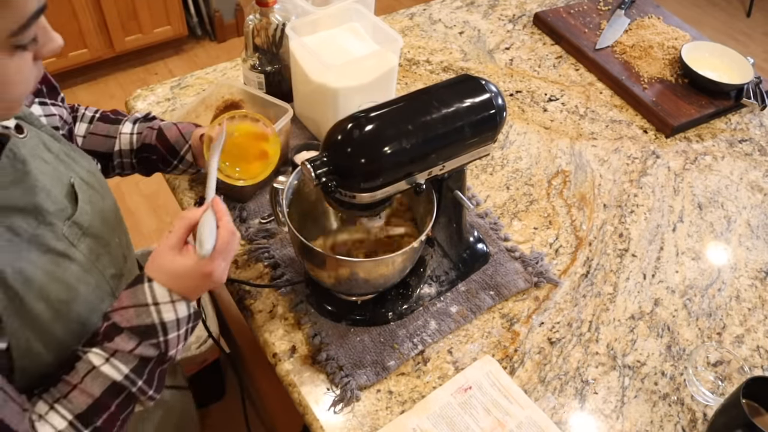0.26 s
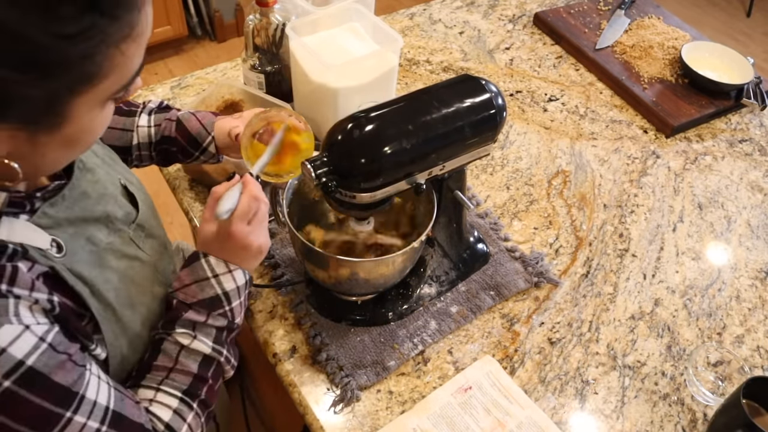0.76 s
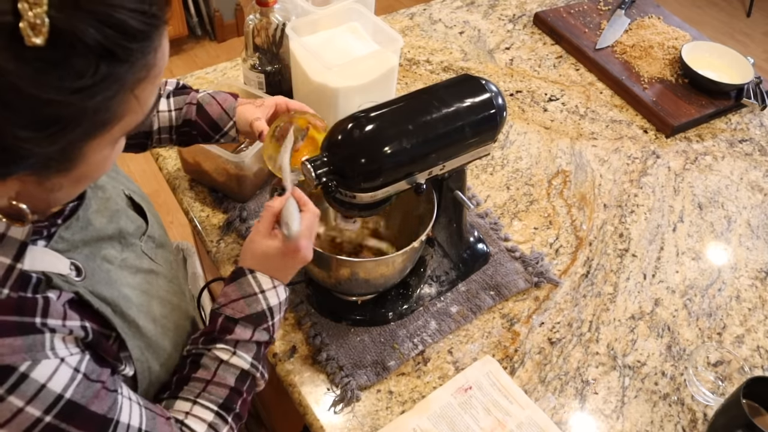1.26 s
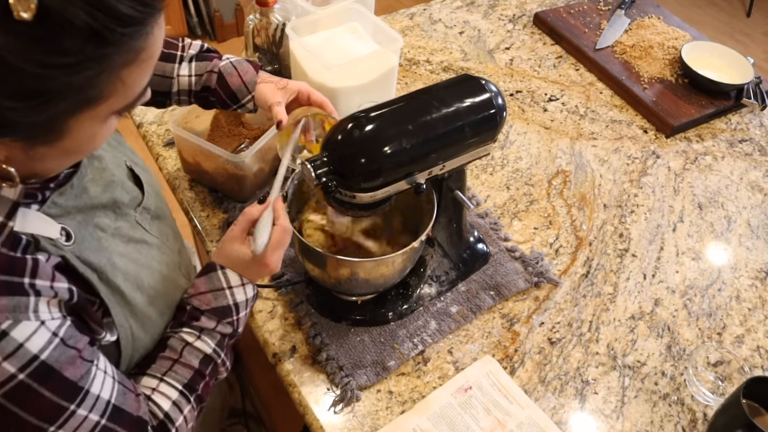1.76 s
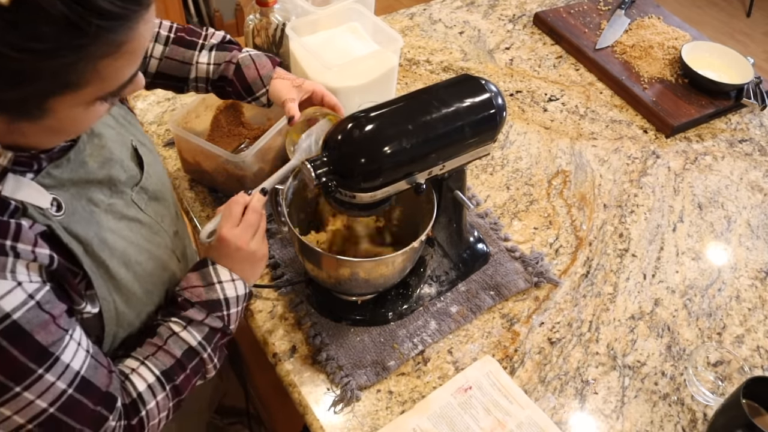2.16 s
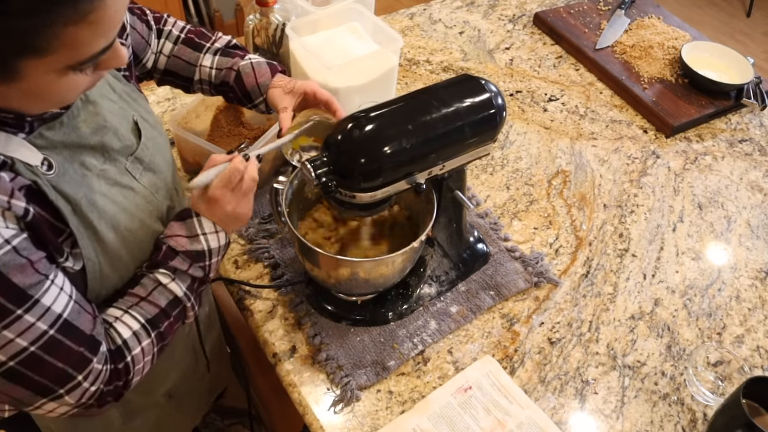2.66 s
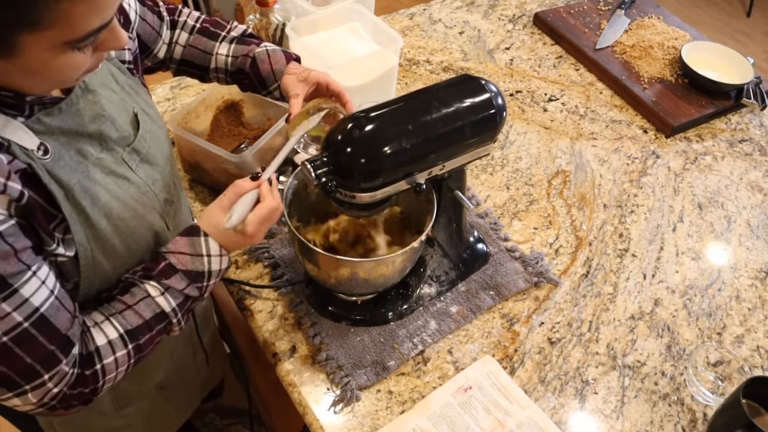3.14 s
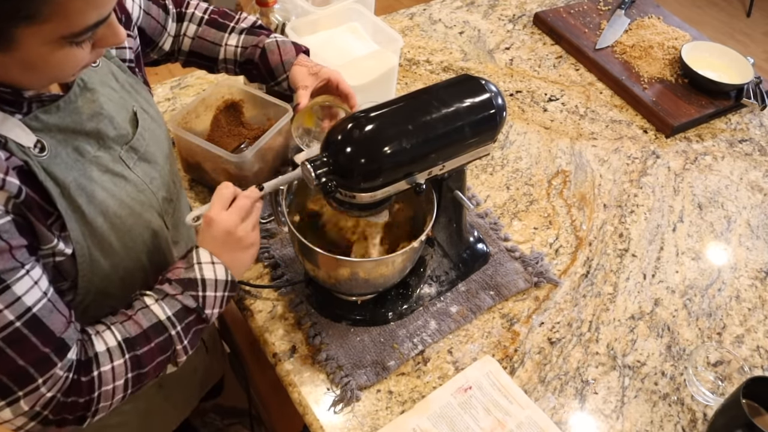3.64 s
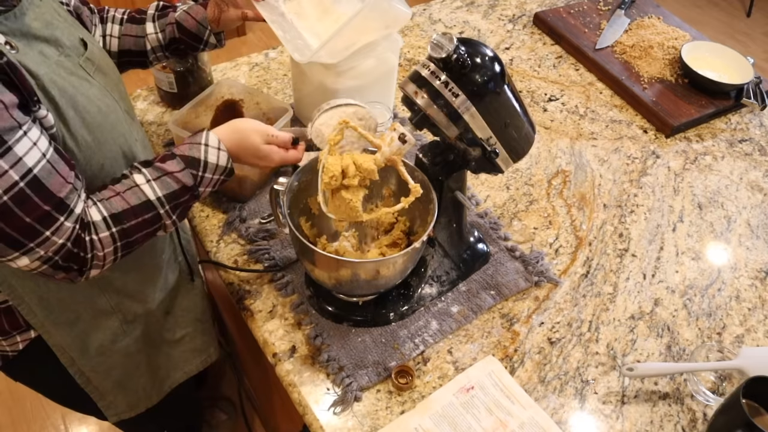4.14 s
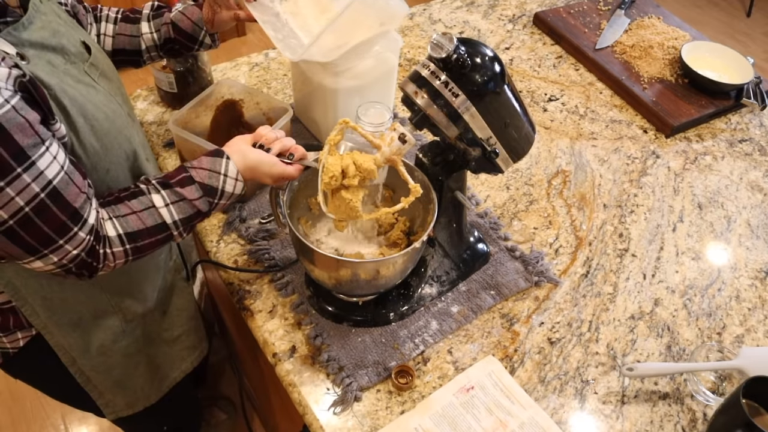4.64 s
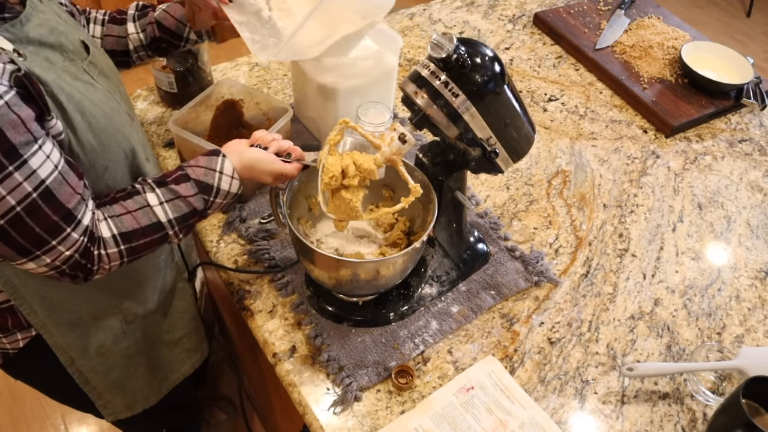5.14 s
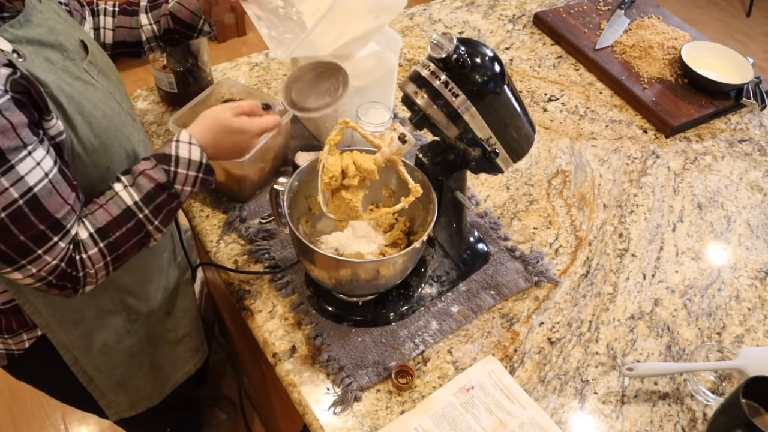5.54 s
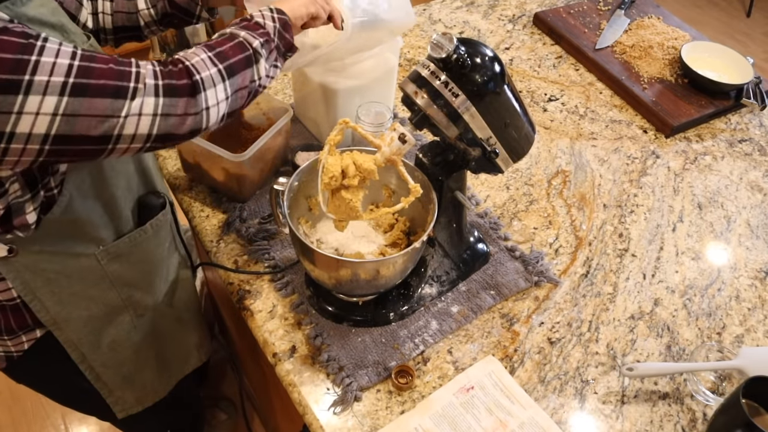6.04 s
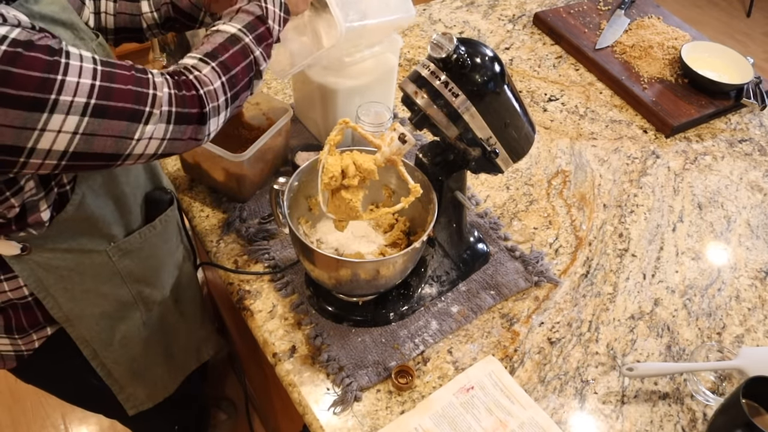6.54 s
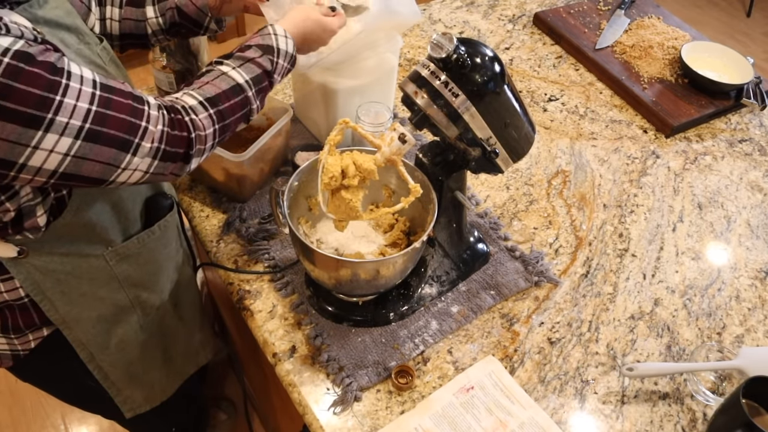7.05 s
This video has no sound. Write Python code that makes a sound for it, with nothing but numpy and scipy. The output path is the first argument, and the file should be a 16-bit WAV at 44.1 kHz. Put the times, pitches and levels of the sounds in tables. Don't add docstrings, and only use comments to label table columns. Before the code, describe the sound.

A stand mixer whines and rattles steadily while a spatula clinks on a glass dish, then cuts off to quiet plastic knocks and rustling.

```python
import sys
import numpy as np
from scipy import signal
from scipy.fft import rfft, irfft
from scipy.io import wavfile
from scipy.ndimage import uniform_filter1d

SR = 44100
rng = np.random.default_rng(int(sys.argv[2]) if len(sys.argv) > 2 else 0)


def transcribe(u):
    v = np.clip(np.atleast_2d(u).T, -1, 1)
    q = np.round(v * 32767).astype(np.int16)
    wavfile.write(sys.argv[1], SR, q)


def magnitude_from_level(level_db):
    exponent = np.asarray(level_db, float) / 20
    return 10 ** exponent


N = 321930
T = np.arange(N) / SR
MOTOR_OFF_S = 4.168

# (time [s], frequency [Hz])
MESH_PITCH = [(0.0, 1879), (0.28, 1852), (0.55, 1891), (0.72, 1858), (0.96, 1848), (1.13, 1892),
              (1.37, 1852), (1.47, 1882), (1.8, 1853), (1.9, 1870), (2.46, 1863), (2.6, 1891), (2.97, 1845),
              (3.14, 1892), (3.5, 1851), (3.62, 1868), (4.03, 1879), (4.17, 1850)]
# (multiple of throb rate [1], level re mesh tone [dB])
SIDE_TONES = [(-2, -22), (-1, -13), (2, -17), (3, -21)]
# (frequency [Hz], level [dB])
HUM_TONES = [(120, -67), (250, -71.5), (6652, -76)]
# (frequency [Hz], half width [Hz], level [dB])
CASING_MODES = [(252.3, 18, -3), (462, 52, 3), (663, 29.3, 2.5), (784, 45, 4), (844.4, 14.4, 5.5),
                (1100, 56, -1), (1885, 560, -8.5)]
# (frequency [Hz], level [dB per Hz])
FAN_SPECTRUM = [(88, -51), (150, -53), (244, -5.5), (303, -16.5), (475, -4), (566, -21), (662, -5),
                (1420, -12), (1900, -3), (2270, -16), (6770, -6.5), (14800, -24), (16000, -49)]

# (low edge [Hz], high edge [Hz])
BLOW_BANDS = [(600, 2000), (100, 600), (2000, 13000)]
# (time [s], mid level [dB], low level [dB], high level [dB], pitch of struck spot [Hz])
DISH_KNOCKS = [
    (1.489, -48, -42, -57, 2020),
    (1.627, -30, -46, -22.5, 4500),
    (1.935, -21, -41, -16.5, 5370),
    (1.948, -32, -45, -22.5, 3400),
    (2.361, -29, -47.5, -46, 2680),
    (2.629, -25, -53, -27.5, 3330),
    (2.642, -31, -44.5, -27.5, 5260),
    (3.538, -24, -35.5, -18, 2200),
    (3.55, -26.5, -53, -23, 4970),
]
TUB_KNOCKS = [(5.316, -23, -23, -24, 650), (5.348, -31, -26.5, -50, 750), (5.409, -32.5, -19.5, -52, 660),
              (5.556, -28.5, -25.5, -44, 760), (5.573, -30, -31.5, -60, 724), (6.03, -6, -11, -16.5, 950),
              (6.062, -11.5, -17.5, -10, 960), (6.19, -22, -19.5, -31, 966), (6.228, -23.5, -5.5, -30, 620),
              (6.524, -24, -42.5, -18, 1300), (6.939, -37, -32.5, -55, 1070)]
SCOOP_KNOCKS = [
    (6.799, -42, -53, -52, 4020),
    (6.81, -41, -56, -38, 4060),
    (6.831, -38, -64, -40, 4500),
    (6.857, -33, -58, -37, 3700),
    (6.868, -21, -45, -62, 2760),
    (6.881, -44, -40, -49, 3080),
]
LID_THUDS = [
    (6.569, -32, -35, -53, 950),
    (6.591, -46, -32.5, -36, 958),
    (6.715, -41, -26.5, -39.5, 1350),
]
SET_DOWN = [
    (7.169, -36.5, -22, -64, 600),
    (7.181, -56, -25.5, -63, 740),
]
RUSTLES = [(4.418, -43.5, -59, -45, 977), (4.546, -44, -46, -58, 680), (4.649, -44, -50, -57, 942),
           (4.702, -40.5, -42, -44, 870), (4.734, -53, -45, -45, 972), (4.797, -48, -51, -49, 1190),
           (4.822, -40, -44, -50, 818), (4.831, -50, -45, -47, 1090), (4.853, -63, -44, -57, 1100),
           (5.16, -34.5, -39.5, -35.5, 860), (6.469, -38, -55, -33, 1030), (6.476, -38, -37.5, -39, 1310)]
# (frequency [Hz], level [dB], t60 [s])
DISH_MODES = [(360, 0, .2), (890, -7, .1), (985, 0, .16), (1028, 0, .12), (1410, -5, .14), (1565, -7, .1),
              (1765, -2, .18), (2025, 0, .08), (2150, -3, .08), (2420, -3, .1), (3400, -3, .22),
              (4124, -8, .1), (4840, 0, .25), (4990, -3, .12), (5160, -2, .14), (5440, -4, .12),
              (7350, -8, .08), (8630, -10, .1)]
TUB_MODES = [(130, -3, .1), (163, 1, .1), (230, -9, .1), (317, -7, .18), (378, 0, .17), (410, -6, .12),
             (545, -9, .08), (720, 0, .08), (820, 0, .08), (950, 2, .08), (1133, -2, .06), (1370, -6, .05),
             (1460, -6, .05)]
SCOOP_MODES = [(400, 0, 0.11), (960, -18, .12), (1040, -7, 0.19), (1160, -2, 0.24), (1315, 23, 0.098),
               (1330, 22, .15), (1420, -11, 0.086)]

# (peak time [s], peak level [dB], rise [s], fall [s], treble re body [dB])
SCUFFS = [(0.098, -44, .06, 0.05, 0), (0.322, -32, 0.056, 0.18, -3.5), (0.7, -40.5, 0.088, 0.11, -5),
          (3.4, -51, 0.023, 0.031, -11), (3.496, -51, 0.084, 0.076, -8), (4.62, -57, 0.5, 0.25, -13),
          (4.822, -52, 0.08, 0.056, -22), (4.95, -55, 0.015, 0.019, -15), (6.039, -17, 0.0053, 0.052, -34),
          (6.074, -45, 0.011, 0.22, 5), (6.198, -33, .02, 0.037, -9), (6.232, -25, 0.016, 0.011, -35),
          (6.79, -61, .05, 0.081, -10), (6.869, -39, 0.018, 0.042, -15), (5.36, -44.5, 0.15, 0.21, -11),
          (6.845, -61, 0.075, .08, 13)]
# (peak time [s], level [dB], rise [s], fall [s])
CREAKS = [
    (4.6, -45, 0.11, 0.051),
    (4.66, -48, .03, 0.039),
]
# (peak time [s], level [dB], fall [s])
BUMPS = [(0.08, -70, .15), (0.32, -44.5, 0.24), (0.64, -50, 0.11), (0.73, -54, .2), (4.35, -63, 0.12),
         (4.74, -54, .15), (4.81, -56, .15), (5.43, -43, .15), (5.59, -45, 0.12), (6.06, -56, 0.18),
         (6.22, -53, .2), (6.57, -60, 0.36), (7.2, -73, 0.18)]
# (frequency [Hz], level [dB per Hz])
KITCHEN_SPECTRUM = [(18, -43), (30, -8), (156, -4.5), (244, -4.5), (264, -10), (309, -5.5), (469, -8),
                    (1410, -14), (2140, -17.5), (2510, -16.5), (3260, -19), (5230, -20.5), (15700, -24)]
# (frequency [Hz], t60 [s])
ROOM_T60 = [(100, 0.45), (500, 0.47), (2000, 0.58), (8000, 0.47)]


def motor():
    throb_hz = 120
    throb = 2 * np.pi * throb_hz * T
    lean_db = 5.5 * np.clip(1 - T / 0.19, 0, 1)
    tones = magnitude_from_level(2.5) * (gear_mesh(throb) + hum())
    direct = unit(casing(throb_hz)) * magnitude_from_level(-52.5 + lean_db) + paddle_ticks()
    wet = room(direct + 0.93 * tones, -3.5)
    out = ports(direct + tones, -1.8) + wet + fan(throb) * magnitude_from_level(-47 + lean_db)
    return out * (T < MOTOR_OFF_S)


def gear_mesh(throb):
    hunt_hz, hunt_rate = 5, 22
    mesh_hz = np.interp(T, *np.transpose(MESH_PITCH)) + hunt_hz * walk(hunt_rate)
    detuning = (mesh_hz - 1865) / 30
    mesh_db = -47.5 - 8 * detuning ** 2 * np.where(detuning > 0, 1, .4)
    upper_db = -52.5 - 9 * detuning
    mesh = 2 * np.pi * np.cumsum(mesh_hz + 3 * walk(25)) / SR
    tone = magnitude_from_level(mesh_db + 2.7 * walk(12)) * np.sin(mesh)
    tone += magnitude_from_level(upper_db + 1.5 * walk(17)) * np.sin(mesh + throb)
    for multiple, db in SIDE_TONES:
        tone += magnitude_from_level(mesh_db + db + 0.9 * walk(17)) * np.sin(mesh + multiple * throb)
    return tone


def hum():
    return sum(magnitude_from_level(db + walk(6.6)) * np.sin(2 * np.pi * hz * T) for hz, db in HUM_TONES)


def casing(throb_hz):
    pulse_size = magnitude_from_level(4.7 * rng.standard_normal(N // 300))[(throb_hz * T).astype(int)]
    decay = np.exp(-(throb_hz * T % 1) / 0.43)
    grit = rng.standard_normal(N) * (2.1 + pulse_size * decay)
    out = 0
    for hz, half_width, db in CASING_MODES:
        mode = unit(band(grit, hz - half_width, hz + half_width))
        out = out + magnitude_from_level(db + 0.93 * walk(9)) * mode * np.sqrt(half_width)
    return out


def fan(throb):
    noise = coloured(FAN_SPECTRUM, channels=3)
    noise = noise * magnitude_from_level(1.1 * walk(9)) * (1 + 0.067 * np.cos(throb))
    return ports(noise[0]) + magnitude_from_level(-4.5) * noise[1:] * np.array([[1.2], [.85]])


def paddle_ticks():
    first_s, turn_s = .0612, .1708
    level_db, scatter_db, soft_db = -45.5, -1.3, -9
    soft_turns = [6, 8, 9, 11, 15, 19]
    ticks, t = np.zeros(N), np.arange(600) / SR
    for k, s in enumerate(np.arange(first_s, MOTOR_OFF_S, turn_s)):
        db = level_db + scatter_db * rng.standard_normal() + soft_db * (k in soft_turns)
        burst = rng.standard_normal(600) * np.exp(-t / 0.0049)
        ticks[int(s * SR):][:600] += magnitude_from_level(db + 15.5) * band(burst, 3600, 7100)
    return ticks


def blows():
    out = knocks(DISH_KNOCKS, DISH_MODES, 933, (-1, 0, -2), .011, 14, 2.8, ring=.68)
    out += knocks(TUB_KNOCKS, TUB_MODES, 392, (10, 2, 3), 0.0066, 16.3, 3.9, ring=0.68)
    out += knocks(SET_DOWN, TUB_MODES, 392, (6, -12, 3), 0.0042, 30, 2.8, ring=.7)
    out += knocks(LID_THUDS, TUB_MODES, 188, (10, 0, 3), 0.009, 20, 3.5)
    out += knocks(SCOOP_KNOCKS, SCOOP_MODES, 1340, (7, 5, 3), .008, 8, 5, ring=0.48)
    out += knocks(RUSTLES, TUB_MODES, 480, (12, 6, 3), 0.0043, 16, 1.5, ring=0.15)
    return out


def knocks(rows, modes, body_hz, crack_db, crack_s, focus_db, rough_db, ring=0.75):
    out, t = np.zeros((2, N + SR)), np.arange(SR // 3) / SR
    hz, mode_db, t60 = np.transpose(modes)[..., None]
    free = magnitude_from_level(mode_db) * np.sin(2 * np.pi * hz * t) * 1000 ** (-t / (t60 * ring))
    dull = signal.butter(1, 2570, fs=SR)
    for s, *band_db, spot_hz in rows:
        octaves = np.minimum(np.abs(np.log2(hz / body_hz)), np.abs(np.log2(hz / spot_hz)))
        favour_db = -focus_db * np.minimum(octaves, .6) + 1.45 * rng.standard_normal(hz.shape)
        held = np.repeat(rng.standard_normal((len(modes), len(t) // 100)), 100, axis=1)
        waver_db = rough_db * uniform_filter1d(held, size=300, axis=1) * np.sqrt(3)
        rings = free * magnitude_from_level(favour_db + waver_db)
        burst = rng.standard_normal(len(t)) * (np.exp(-t / crack_s) + .8 * np.exp(-t / .001))
        crack = 1.49 * signal.lfilter(*dull, burst)
        crack += band(burst, body_hz / 1.59, body_hz * 1.09)
        crack += 1.4 * band(burst, spot_hz / 1.396, spot_hz * 1.364)
        for (lo, hi), db, share_db, pan_db in zip(BLOW_BANDS, band_db, crack_db, (-.6, -1.4, 1.8)):
            part = rings[(hz[:, 0] >= lo) & (hz[:, 0] < hi)].sum(axis=0)
            part = part / (np.abs(part).max() + 1e-9) + magnitude_from_level(share_db) * crack
            part = band(band(part, lo, hi), 1.18 * lo, 0.95 * hi)
            out[:, int(s * SR):][:, :len(t)] += ports(part * magnitude_from_level(db) / np.abs(part).max(), pan_db)
    return out[:, :N]


def scuffs_and_creak():
    grains = rng.standard_normal(N) * magnitude_from_level(4.7 * walk(200))
    low, high = unit(band(grains, 156, 1430)), unit(band(grains, 1020, 5080))
    slides = sum(swell(*shape) * (low + magnitude_from_level(treble_db) * high) for *shape, treble_db in SCUFFS)
    creak_hz = 451
    creak = sum(swell(*shape) for shape in CREAKS) * unit(band(grains, creak_hz - 20, creak_hz + 30))
    return slides + creak


def counter_bumps():
    tremor_db, rise_s = -69, 0.058
    shake = magnitude_from_level(tremor_db + 1.3 * walk(10))
    shake = shake + sum(swell(s, db, rise_s, fall_s) for s, db, fall_s in BUMPS)
    return shake * unit(band(band(rng.standard_normal(N), 48, 119), 48, 119))


def room(x, wet_db):
    t = np.arange(SR // 2) / SR
    hz, t60 = np.transpose(ROOM_T60)
    tail = 0
    for f in 80 * 2. ** np.arange(8):
        noise = band(rng.standard_normal((2, len(t))), f / 1.406, f * 1.207)
        mid, side = noise * 1000 ** (-t / np.interp(f, hz, t60))
        tail = tail + mid + min(f / 1500, 1) ** 0.53 * side * np.array([[1], [-1]])
    tail *= np.clip(t / 0.0092 - .2, 0, 1)
    tail = tail / np.sqrt(np.sum(tail ** 2) / 2)
    return magnitude_from_level(wet_db) * signal.fftconvolve(x[None], tail, axes=1)[:, :N]


def kitchen():
    air = coloured(KITCHEN_SPECTRUM, channels=3)
    gain_step_db = 7.5
    level_db = -56.5 + 0.2 * walk(3.18) - gain_step_db * (T < MOTOR_OFF_S)
    return (air[0] + 1.07 * air[1:]) * magnitude_from_level(level_db)


def ports(x, pan_db=0.):
    return np.array([x * magnitude_from_level(pan_db / 2), np.roll(x, 2) * magnitude_from_level(-pan_db / 2)])


def swell(peak_s, db, rise_s, fall_s):
    distance = np.maximum((peak_s - T) / abs(rise_s), (T - peak_s) / abs(fall_s))
    return magnitude_from_level(db - 26 * distance.clip(0, 8))


def walk(rate):
    k = int(SR / rate)
    held = np.repeat(rng.standard_normal(N // k + 1), k)
    return 1.229 * uniform_filter1d(uniform_filter1d(held, k), k)[:N]


def coloured(spectrum, channels=1):
    hz, db = np.transpose(spectrum)
    f = np.arange(N // 2 + 1) * SR / N + 1
    white = rfft(rng.standard_normal((channels, N)))
    return unit(irfft(white * magnitude_from_level(np.interp(np.log(f), np.log(hz), db)), N))


def band(x, lo_hz, hi_hz):
    return signal.sosfilt(signal.butter(2, [lo_hz, hi_hz], "band", fs=SR, output="sos"), x)


def unit(x):
    return x / np.sqrt(np.mean(x ** 2))


def drop_treble(x):
    frame, frame_start, band_hz, top_hz = 1024, 271, 345, 15850
    pad = frame - frame_start
    f, t, z = signal.stft(np.pad(x, ((0, 0), (pad, 0))), SR, "cosine", 2 * frame, frame)
    t = t - pad / SR
    dropout = .55 * walk(14)[np.clip(t * SR, 0, N - 1).astype(int)]
    for s, db, *_ in DISH_KNOCKS:
        dropout += 30 * magnitude_from_level(db) * (t > s + .02) * np.exp(-np.abs(t - s) / 0.074)
    bands = (f // band_hz).astype(int)
    luck = uniform_filter1d(rng.standard_normal((bands.max() + 1, len(t))), size=2, axis=1)[bands]
    lost = (bands[:, None] * band_hz - 14000) / 3200 + dropout + luck > 0
    lost = lost & (f[:, None] > 9650) & (t < MOTOR_OFF_S)
    z = z * ~(lost | (f[:, None] > top_hz))
    return signal.istft(z, SR, "cosine", 2 * frame, frame)[1][:, pad:pad + N]


def scene():
    struck, slides = blows(), scuffs_and_creak()
    wet = room(struck.mean(axis=0) + slides, -5.0)
    return motor() + struck + ports(slides) + wet + counter_bumps() + kitchen()


def low_pass(x):
    return signal.sosfilt(signal.butter(12, 16720, fs=SR, output="sos"), x)


def record(dry):
    mix = drop_treble(dry)
    return low_pass(mix)


dry = scene()
out = record(dry)
transcribe(out)
```